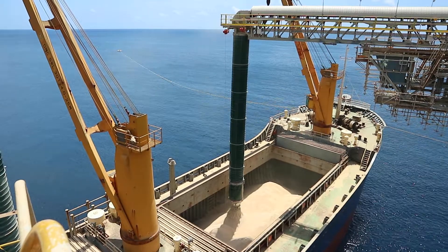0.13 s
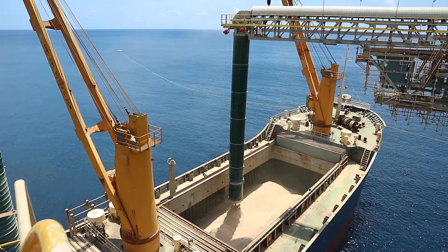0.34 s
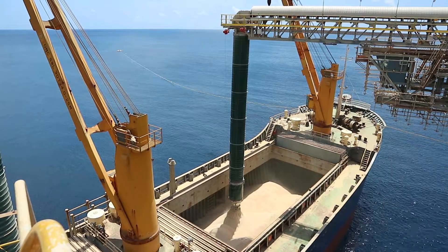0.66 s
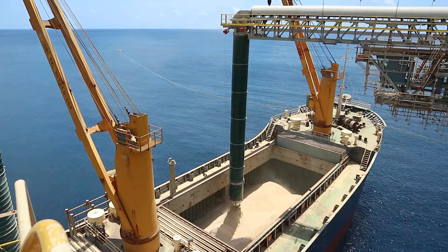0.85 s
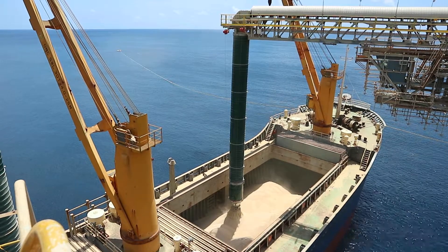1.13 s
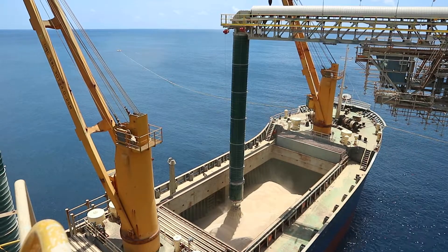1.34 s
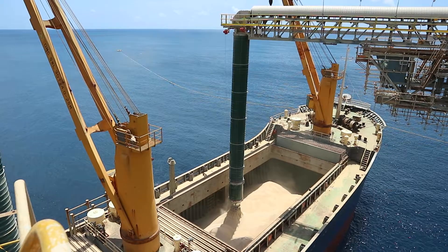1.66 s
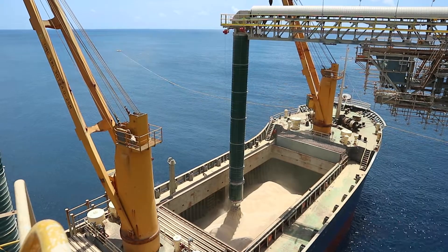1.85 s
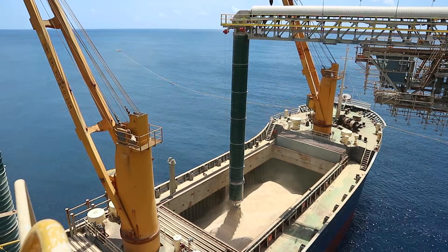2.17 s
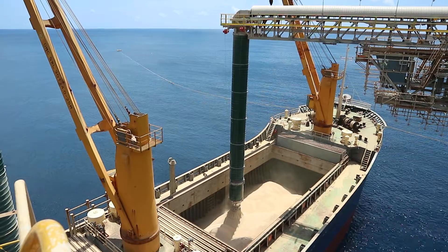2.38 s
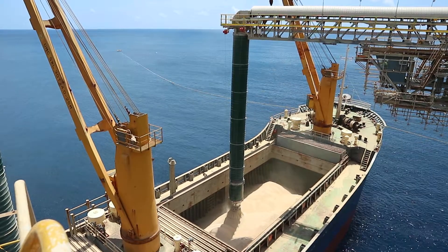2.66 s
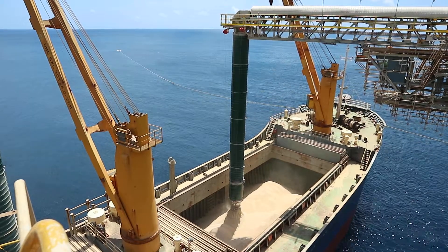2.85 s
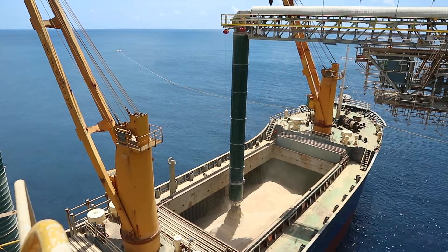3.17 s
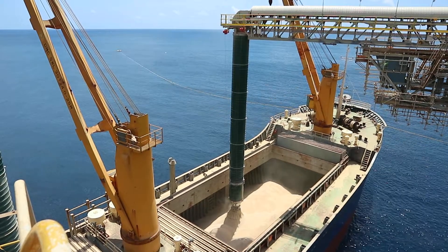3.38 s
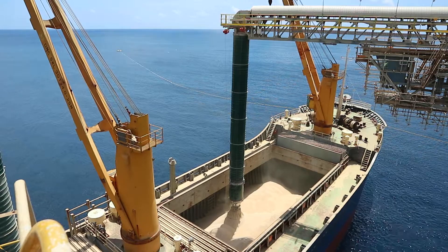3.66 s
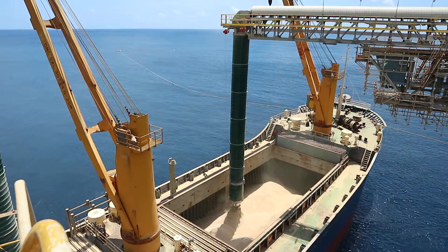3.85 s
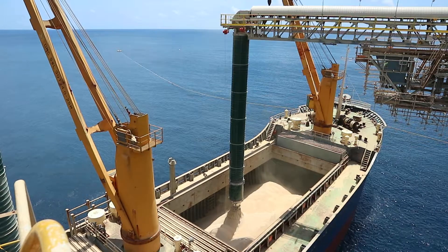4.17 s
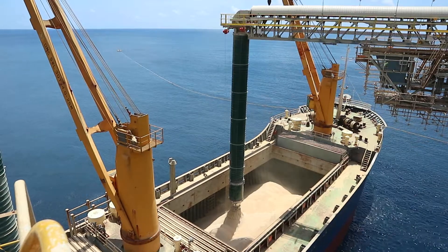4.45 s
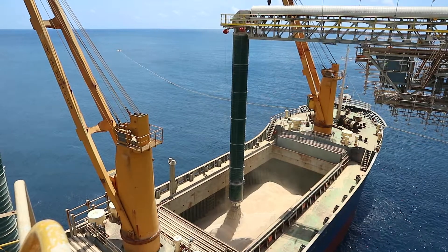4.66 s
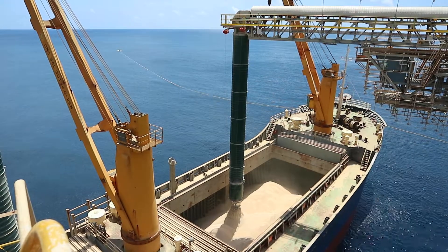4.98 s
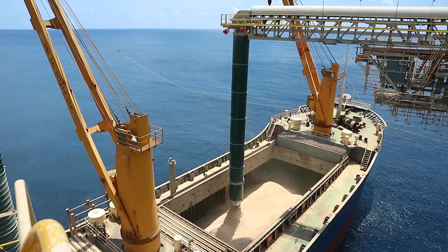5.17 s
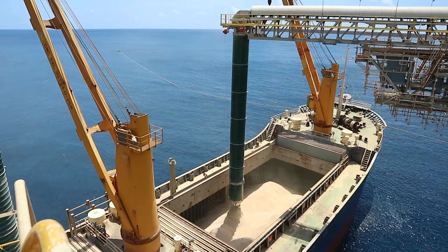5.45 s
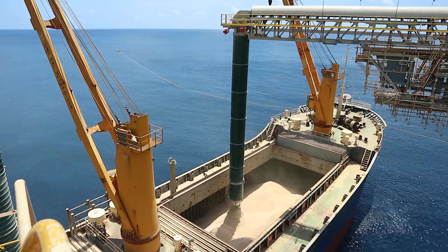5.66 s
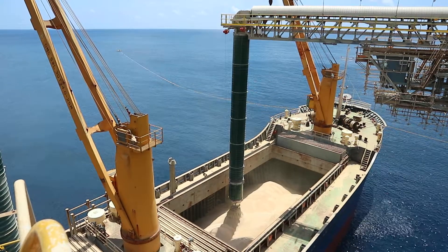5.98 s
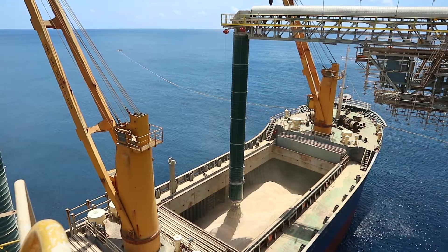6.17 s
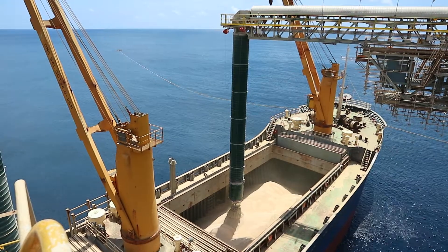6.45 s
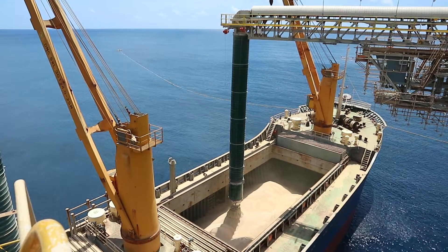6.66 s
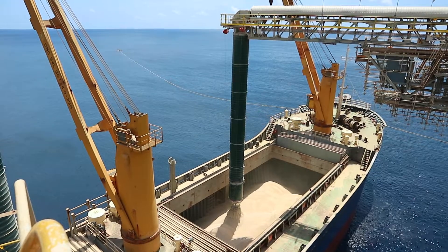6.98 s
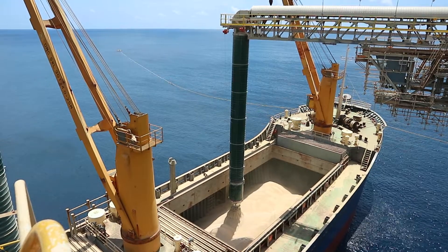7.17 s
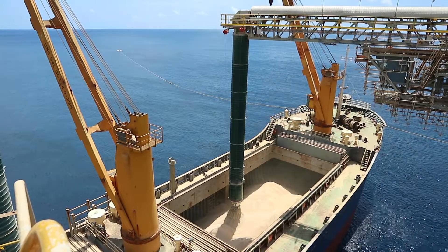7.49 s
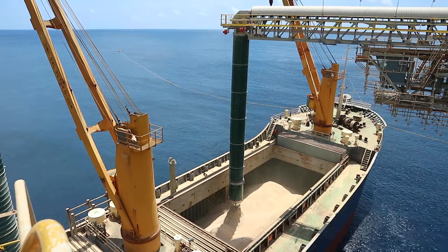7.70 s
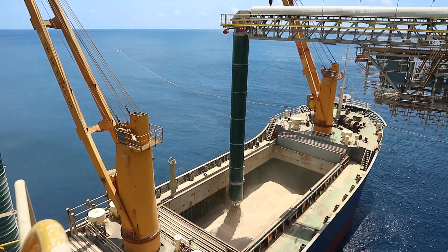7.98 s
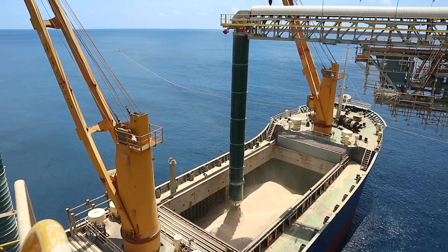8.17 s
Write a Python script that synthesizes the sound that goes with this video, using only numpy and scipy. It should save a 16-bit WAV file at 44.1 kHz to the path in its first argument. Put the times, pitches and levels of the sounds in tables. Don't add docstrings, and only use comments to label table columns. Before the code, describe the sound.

From 0 s a squall batters a small stereo microphone on an open deck: a loud cluster of slaps at 0.15-0.2 s, then rough buffeting, dry cracks and bright tearing bursts until about 2.3 s, sometimes overloading. Behind it the dense rush of grain down a chute into a steel hold is ducked, lowest near 1.8 s. From 2.4 s the wind eases and the roar swells back, full by 3.6 s, steady and mid-heavy with a faint wavering conveyor whine around 680 Hz. Between 3.8 and 6.6 s come small loose-steel rattles, slightly right, and dull low thumps, with brief gusts at 4.1-4.7 s. Wind pushes return at 5.8 s, growing into heavy blows at 6.6-7.1 s. From 7.3 s a last squall slaps and tears, ducking the loader again, still gusting as it ends around 8.3 s.

```python
import sys
import numpy as np
from scipy import signal
from scipy.fft import rfft, irfft
from scipy.io import wavfile
from scipy.ndimage import uniform_filter1d

SR = 44100
rng = np.random.default_rng(int(sys.argv[2]) if len(sys.argv) > 2 else 0)


def gain_from_db(level_db):
    decades = np.asarray(level_db, float) / 20
    return 10 ** decades


def wrap_up_sound(samples):
    columns = np.atleast_2d(samples).T
    tamed = np.clip(columns, -1, 1)
    steps = np.round(tamed * 32767).astype(np.int16)
    wavfile.write(sys.argv[1], SR, steps)


N = 367353

# start_s, buffeting_db, eddy_pitch_hz
BREEZE = [(.07, -25, 430), (.27, -16.5, 1380), (.57, -18, 1270), (1.09, -18.5, 916), (1.48, -19, 1020),
          (1.65, -34, 612), (1.87, -20, 1044), (2.03, -24.5, 780), (2.33, -39, 497), (3.02, -35, 350),
          (3.25, -24, 560), (3.6, -30, 252), (5.4, -37, 224), (5.9, -31, 403), (7.2, -40.5, 411),
          (7.48, -18.5, 882), (7.94, -34, 476), (8.085, -28.5, 504), (8.15, -13.5, 982)]
# start_s, peak_db, pitch_hz
SLAPS = [(0.155, -8.5, 815), (0.161, 0, 600), (0.168, -1, 580), (0.197, -3, 1000), (1.004, -7.5, 1190),
         (1.155, -10, 1020), (1.328, -4, 1100), (1.584, -7.5, 326), (1.861, -7, 420), (1.973, -4.5, 430),
         (2.086, -5.5, 347), (2.178, -5.5, 1100), (2.275, -3, 800), (2.42, -11, 357), (2.484, -23, 700),
         (4.148, -3, 790), (5.841, -6.5, 466), (5.821, -2, 250), (5.908, -6, 450), (6.638, -5, 396),
         (6.797, -5.5, 232), (6.915, 4.5, 260), (6.939, -6.5, 700), (6.972, -4, 668), (7.018, -19, 511),
         (7.114, -1.5, 480), (7.313, -4.5, 474), (7.347, -4, 403), (7.392, 2.5, 549), (7.62, -9.5, 829),
         (7.86, -19, 600), (7.988, -15, 600), (8.106, -13, 425)]
# start_s, peak_db
CRACKS = [(0.184, -22.5), (0.198, -17), (0.365, -43.5), (0.5225, -31.5), (0.597, -34), (0.628, -28.5),
          (0.71, -43), (0.876, -39), (0.976, -36), (1.1524, -34), (1.169, -27.5), (1.329, -32),
          (1.4423, -33.5), (1.943, -34), (2.048, -44.5), (7.49, -41), (7.595, -41), (7.649, -37.5)]
# start_s, peak_db
TEARS = [(0.1963, 3), (0.2851, -16.5), (0.3218, -17.5), (0.3744, -16.5), (0.4112, -0.5), (0.4747, -17),
         (0.4955, -3), (0.5211, -9), (0.549, -22.5), (0.575, -16), (0.594, -7), (0.6676, -13.5),
         (0.7058, -13), (0.7328, -27.5), (0.915, -14), (0.9626, -19), (0.9751, -13.5), (1.031, -19),
         (1.0544, -16), (1.0897, -15), (1.1142, -18.5), (1.1547, -8), (1.1683, -2.5), (1.224, -22.5),
         (1.2496, -17), (1.2997, -5), (1.363, -11.5), (1.3853, -16), (1.4006, -11), (1.442, -16),
         (1.4813, -20), (1.5553, -31), (1.7742, -22.5), (1.8152, -9.5), (1.8485, -7.5), (1.867, -7),
         (1.8994, -25), (1.915, -22), (1.939, -18.5), (1.9913, -7.5), (2.172, -21), (2.1786, -23)]
# start_s, peak_db
LATE_TEARS = [(7.324, -10), (7.3487, -8.5), (7.4116, -14), (7.456, -18), (7.469, -24.5), (7.4875, -19.5),
              (7.5025, -14.5), (7.5493, -9.5), (7.5961, -13.5), (7.6183, -8.5), (7.644, -8), (7.683, -17.5),
              (7.7357, -21.5), (7.7613, -16.5), (7.7973, -19), (7.9112, -21.5), (8.102, -14),
              (8.138, -18.5), (8.1988, -9), (8.2921, -12.5)]


def in_time(rows, step):
    s, *columns = np.transpose(rows)
    return [np.interp(np.arange(0, N + step, step) / SR, s, c) for c in columns]


def at_hz(points, hz):
    point_hz, value = np.transpose(points)
    return np.interp(np.log(hz), np.log(point_hz), value)


def rms_one(x):
    return x / np.sqrt(np.mean(x ** 2))


def full_rate(slow):
    return np.interp(np.arange(N) / 32, np.arange(len(slow)), slow)


def drift(rate_hz, step):
    r = np.exp(-2 * np.pi * step * rate_hz / SR)
    white = rng.standard_normal(N // step + 2002)
    return rms_one(signal.lfilter([1], [1, -2 * r, r * r], white)[2000:])


def bank(white, gain, patchy_db, rate_hz):
    hz, s, frames = signal.stft(white, SR, nperseg=1024, noverlap=768)
    hz = np.maximum(hz, 15)[:, None]
    patches = np.array([drift(rate_hz, step=256)[:len(s)] for _ in range(33)])
    band = (3 * np.log2(hz[:, 0] / 15)).astype(int)
    shaped = frames * gain(hz, s) * gain_from_db(patchy_db * patches[band])
    return signal.istft(shaped, SR, nperseg=1024, noverlap=768)[1][:, :N]


def ring(at_s, size, hz, t60_s):
    clicks = np.full(N, 1e-18)
    clicks[(np.asarray(at_s) * SR).astype(int)] = size
    r, w = gain_from_db(-60 / (t60_s * SR)), 2 * np.pi * hz / SR
    return signal.lfilter([0, np.sin(w)], [1, -2 * r * np.cos(w), r * r], clicks)


def whine():
    # start_s, lift_db
    swells = [(2.73, 2), (3.58, 15), (4.3, 13), (5.3, 6), (5.41, 11), (5.45, 16), (5.59, 17), (5.73, 17.5),
              (5.8, 9), (6.46, 13), (7.25, 9)]
    swell_s = 0.022
    hz = 678 + 12 * full_rate(drift(6.03, step=32))
    t = np.arange(0, N + 32, 32) / SR
    lift_db = sum(db * np.exp(-0.5 * ((t - s) / swell_s) ** 2) for s, db in swells)
    level_db = -39.5 + full_rate(lift_db) + 3.9 * full_rate(drift(2.7, step=32))
    return gain_from_db(level_db) * np.sin(2 * np.pi * np.cumsum(hz) / SR) * [[1], [-0.05]]


def rattle():
    # start_s, peak_db
    knocks = [(3.8543, -42.5), (4.096, -30.5), (4.199, -28.5), (4.3083, -35), (4.565, -42.5),
              (5.349, -35.5), (5.749, -27.5), (5.8312, -28), (5.9566, -20), (5.976, -23), (6.084, -20.5),
              (6.27, -30.5), (6.3688, -28.5), (6.498, -22), (6.5406, -31)]
    # pitch_hz, level_db, t60_s
    modes = [
        (3600, -14, .006),
        (4520, 0.5, .008),
        (5530, 4, 0.014),
        (6370, -6, 0.015),
        (7600, -33.5, 0.0053),
    ]
    s, db = np.transpose(knocks)
    chance = rng.standard_normal((len(s), len(modes)))
    x = np.zeros(N)
    for k, (hz, level_db, t60_s) in enumerate(modes):
        x = x + ring(s, gain_from_db(db + level_db - 30.5 + 5.0 * chance[:, k]), hz, t60_s)
    chatter = rng.standard_normal(600) * np.exp(-np.arange(600) / (0.0073 * SR))
    return signal.fftconvolve(x, chatter)[:N] * [[1], [-0.4]]


def roar(surge_db, patchy_db):
    # pitch_hz, level_db_per_hz
    mid_spectrum = [(35, -50), (60, -18.5), (222, -4), (339, -1), (393, -5), (495, -0.5), (562, -6.5),
                    (665, -1), (755, -6), (1150, -6.5), (1390, -15.5), (1910, -13.5), (4170, -30),
                    (7860, -50.5), (9310, -54), (12100, -85.5), (20500, -120)]
    # pitch_hz, level_db_per_hz
    side_spectrum = [(300, -48), (700, -24.5), (1100, 0.5), (1400, -13.5), (1900, 1), (3000, -1.5),
                     (5000, -6), (7000, -12), (9500, -14), (13000, -19.5), (16000, -15)]
    # pitch_hz, width_hz, lift_db
    resonances = [(426, 93, 4), (672, 60, 4), (829, 20, 7.5), (916, 33, 4.5), (1133, 92, 4.5),
                  (1886, 30, 8.5), (2146, 180, 4), (2578, 67, 6.5), (2920, 18, 5.5), (3380, 53, 4),
                  (3690, 45, 5.5), (4120, 30, 5.5), (4950, 240, -2), (5460, 290, 4), (7630, 1900, 4.5)]
    # pitch_hz, share_0_to_1
    side_share = [
        (1000, .3),
        (2500, .65),
        (5000, 0.4),
        (9000, .2),
    ]
    mid_db, side_db = -18.5, -41.0

    flow = gain_from_db(surge_db * full_rate(drift(0.92, step=32)))
    grain = bank(rng.standard_normal((2, N)), lambda hz, s: 1, patchy_db, rate_hz=16.5)
    mid, other = rfft(flow * grain)
    hz = np.maximum(np.arange(len(mid)) * SR / N, 1)
    lift_db = sum(db / (1 + (2 * (hz - f) / w) ** 2) for f, w, db in resonances)
    share = np.clip(at_hz(side_share, hz), 0, 1)
    side = np.sqrt(1 - share ** 2) * other + share * mid * np.exp(1j * 2.5)
    side = side * gain_from_db(at_hz(side_spectrum, hz) + 0.4 * lift_db)
    mid = mid * gain_from_db(at_hz(mid_spectrum, hz) + lift_db)
    return np.array([gain_from_db(mid_db) * rms_one(irfft(mid, N)), gain_from_db(side_db) * rms_one(irfft(side, N))])


def thumps():
    # start_s, peak_db
    pushes = [(3.82, -24), (3.919, -36), (4.123, -24), (4.309, -32.5), (5.238, -34), (5.361, -30),
              (5.789, -33), (6.06, -28), (6.268, -29), (6.59, -22), (6.758, -34), (6.899, -28)]
    pitch_hz, t60_s = 60, 0.074
    chance = rng.standard_normal((len(pushes), 2))
    x = np.zeros(N)
    for (s, db), (a, b) in zip(pushes, chance):
        x = x + ring([s + 0.031], np.sign(a) * gain_from_db(db + 7.5), pitch_hz * gain_from_db(2.7 * b), t60_s)
    return signal.sosfilt(signal.butter(2, 150, fs=SR, output="sos"), x) * [[1], [0]]


def slaps(cycles):
    sign = rng.choice([-1, 1], len(SLAPS))
    push = sum(ring([s], k * gain_from_db(db + 1.5), hz, cycles / hz) for k, (s, db, hz) in zip(sign, SLAPS))
    push = signal.sosfilt(signal.butter(3, [120, 2000], "band", fs=SR, output="sos"), push)
    s, db = np.transpose(CRACKS)
    crack = ring(s, gain_from_db(db + 5.0), 2400, 0.0019)
    return np.array([push + crack, 0.7 * crack])


def tears():
    decay_s, burst_db, spike_db, spike_hz = 0.009, -8, -3.5, 1100
    s, db = np.transpose(TEARS + LATE_TEARS)
    clicks = np.full(N, 1e-18)
    clicks[(s * SR).astype(int)] = gain_from_db(db + burst_db)
    swell = signal.lfilter([1], [1, -np.exp(-1 / (decay_s * SR))], clicks)
    swell = uniform_filter1d(swell, size=133, origin=66)
    band = signal.butter(2, [700, 2600], "band", fs=SR, output="sos")
    burst = signal.sosfilt(band, swell * rng.standard_normal((2, N)))
    sign = rng.choice([-1, 1], len(s))
    spike = ring(s + 0.003, sign * gain_from_db(db + spike_db), spike_hz, 1.9 / spike_hz)
    both = 1.02 * burst * [[1], [0.45]] + spike * [[1], [0.2]]
    return signal.sosfilt(signal.butter(4, 3300, fs=SR, output="sos"), both)


def buffeting():
    gusts = [(.01, .03, -18.5), (0.123, .025, -19.5), (0.172, 0.05, -14), (0.68, 0.0097, -16.5),
             (0.793, .03, -22.5), (1.01, 0.18, -22.5), (1.174, .25, -19), (1.459, 0.064, -17),
             (1.58, 0.019, -28), (1.75, 0.033, -24), (1.804, 0.06, -18.5), (1.923, 0.074, -17.5),
             (2.018, 0.027, -21), (2.088, 0.032, -18.5), (2.166, 0.013, -20.5), (2.22, 0.022, -22),
             (2.273, .025, -23), (2.316, .012, -26), (2.423, 0.22, -30), (4.1, .05, -26.5),
             (4.322, 0.07, -25.5), (4.568, 0.056, -23.5), (4.736, 0.05, -32.5), (5.808, .045, -20.5),
             (5.874, .04, -19.5), (6.07, 0.46, -21.5), (6.245, .03, -22), (6.583, 0.082, -14),
             (6.793, 0.015, -13), (6.883, 0.058, -16.5), (6.969, .04, -18.5), (7.009, .016, -14.5),
             (7.113, 0.006, -22.5), (7.14, .015, -27.5), (7.398, .03, -16.5), (7.332, 0.088, -14.5),
             (7.497, 0.18, -16.5), (7.694, 0.17, -19.5)]
    rise_db_per_s, fall_db_per_s = 503.5, 420.5
    breeze_db, eddy_hz = in_time(BREEZE, step=32)
    t = np.arange(len(eddy_hz)) * 32 / SR
    start, hold, db = np.transpose(gusts)[:, :, None]
    rise_db = rise_db_per_s * np.maximum(start - t, 0)
    fall_db = fall_db_per_s * np.maximum(t - start - np.abs(hold), 0)
    gust_power = (gain_from_db(db - rise_db - fall_db) ** 2).sum(axis=0)
    return 10 * np.log10(gain_from_db(breeze_db) ** 2 + gust_power), eddy_hz


def pops():
    pops_per_s, share = 900, 0.41
    hits = rng.random((2, N)) < pops_per_s / SR
    clicks = hits * np.clip(rng.standard_normal((2, N)), -1.5, 1.5)
    return np.sqrt(1 - share) * rng.standard_normal((2, N)) + np.sqrt(share) * rms_one(clicks)


def eddies(hz, s):
    start_s, _, pitch_hz = np.transpose(BREEZE)
    eddy_hz = np.interp(s, start_s, pitch_hz)
    u, cut_hz = hz / eddy_hz, 210 * (eddy_hz / 500) ** 0.085
    power = u ** 2 / (1 + (u / 0.29) ** 2) ** 1.08 / (1 + (u / 2.43) ** 2) ** 7.22
    power = power / (1 + (cut_hz / hz) ** 2.8) / (1 + (eddy_hz / 21.0 / hz) ** 2.0)
    return np.sqrt(power / power.mean(axis=0))


def wind(slow_db, fast_db, grain_db, patchy_db, slap_s):
    # pitch_hz, side_over_centre_db
    side_spectrum = [
        (60, -38),
        (180, -45.5),
        (320, -27),
        (550, -24),
        (960, -13.5),
        (1680, -4),
        (2920, 2),
        (5090, 7.5),
        (8860, 12),
    ]
    tear_lift_db, tear_lift_s = 3, 0.0061

    level_db, eddy_hz = buffeting()
    slow = slow_db * drift(40.0, step=32)[:len(eddy_hz)] * (500 / eddy_hz) ** 0.44
    lumps_db = slow + fast_db * drift(220.0, step=32)[:len(eddy_hz)]
    lumps_db = 3.8 * np.tanh(lumps_db / 7.7)
    t = np.arange(len(lumps_db)) * 32 / SR
    tearing = sum(np.exp(-0.5 * ((t - s - 0.006) / tear_lift_s) ** 2) for s, _ in TEARS + LATE_TEARS)
    lumps_db = lumps_db + tear_lift_db * (tearing - 0.29 * (eddy_hz > 700))

    s, db, _ = np.transpose(SLAPS)
    clicks = np.zeros(N)
    clicks[(s * SR).astype(int)] = gain_from_db(db - 11.5)
    swell = signal.lfilter([1], [1, -np.exp(-1 / (slap_s * SR))], clicks + 1e-18)
    swell = uniform_filter1d(swell, size=89, origin=44)

    x = bank(pops(), eddies, patchy_db, rate_hz=22.7)
    x = x * (full_rate(gain_from_db(level_db - 1.26 + lumps_db)) + swell)
    x = 0.8 * np.tanh(x / 0.8)
    top = signal.sosfiltfilt(signal.butter(2, 1300, "high", fs=SR, output="sos"), x)
    crackle = full_rate(gain_from_db(grain_db * np.clip(drift(120.0, step=32), -2.5, 2.2)))
    x = x - top + top * crackle
    hz = np.maximum(np.arange(N // 2 + 1) * SR / N, 1)
    return np.array([x[0], irfft(rfft(x[1]) * gain_from_db(at_hz(side_spectrum, hz)), N)])


def scene():
    # start_s, gain_db
    gain_curve = [(0, -4.5), (.15, -4), (.25, -8), (.8, -12.5), (1.3, -16), (1.8, -17), (2.3, -15),
                  (2.55, -9.5), (3.3, -4), (3.6, 0), (5.8, 0), (5.95, -1.5), (6.5, 1.5), (6.75, -3.5),
                  (7.3, -4), (7.45, -12.5), (8.05, -11.5), (8.33, -10)]
    gain_db, = in_time(gain_curve, step=1)
    loader = whine() + rattle() + roar(surge_db=0.5, patchy_db=1.64)
    loader = gain_from_db(gain_db[:N]) * loader
    air = thumps() + slaps(cycles=1.3) + tears()
    air = air + wind(slow_db=0.0, fast_db=3.5, grain_db=3.5, patchy_db=2.5, slap_s=0.005)
    mid, side = loader + air
    return np.array([mid + side, mid - side])


def mute_masked(mid, side, treble_db, side_db):
    wide_open_s = [.19, .628, 1.328, 1.4414, 4.29]
    hz, s, frames = signal.stft(np.array([mid, side]), SR, nperseg=2048, noverlap=1024)
    power = np.abs(frames[:, :1024].reshape(2, 64, 16, -1)) ** 2
    band_db = 10 * np.log10(power.sum(axis=2) + 1e-20)
    masker_db = 10 * np.log10(power[:, 9:14].sum(axis=(0, 1, 2)) + 1e-20)
    masker_db = masker_db + 1.8 * rng.standard_normal(len(s))
    low = hz[:1024:16, None]
    cracking = np.abs(s - np.array(CRACKS)[:, :1]).min(axis=0) < 0.012
    wide_open = np.abs(s - np.c_[wide_open_s]).min(axis=0) < 0.012
    strong = (band_db[0] > masker_db + treble_db) & (low < 9400)
    keep_mid = strong | (low < 6000) | cracking & (low < 9000) | wide_open
    keep_side = (band_db[1] > band_db[0] + side_db) | (low > 1800)
    frames[:, :1024] *= np.repeat([keep_mid, keep_side], 16, axis=1)
    return signal.istft(frames, SR, nperseg=2048, noverlap=1024)[1][:, :N]


def band_limit(x):
    return signal.sosfilt(signal.butter(12, 15720, fs=SR, output="sos"), x)


def record(dry):
    bass_cut = signal.butter(3, 45, "high", fs=SR, output="sos")
    left, right = np.clip(signal.sosfilt(bass_cut, dry), -0.99, 0.99)
    mid, side = mute_masked((left + right) / 2, (left - right) / 2, treble_db=-31.5, side_db=-25.5)
    return band_limit(np.array([mid + side, mid - side]))


dry = scene()
out = record(dry)
wrap_up_sound(out)
```